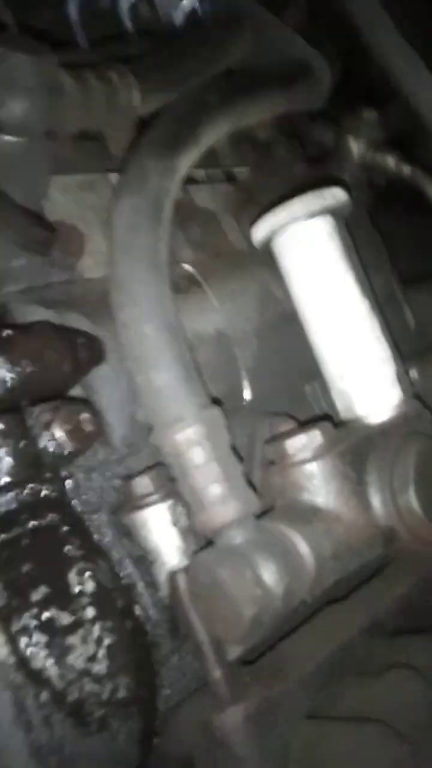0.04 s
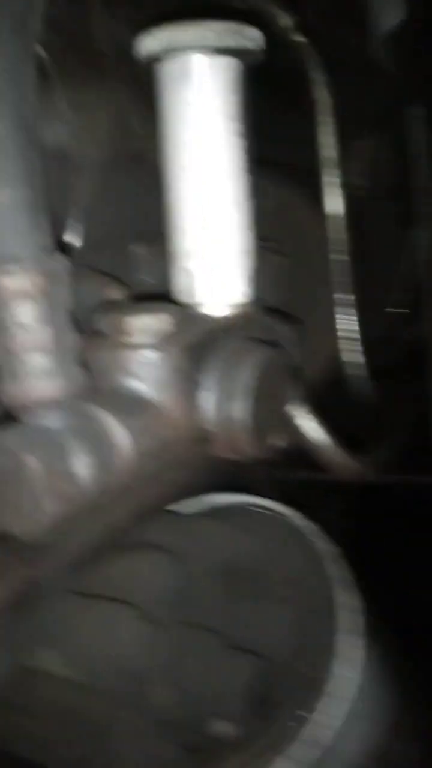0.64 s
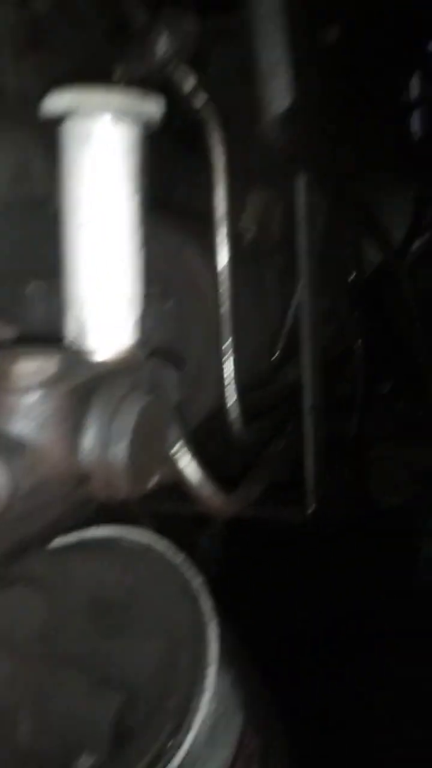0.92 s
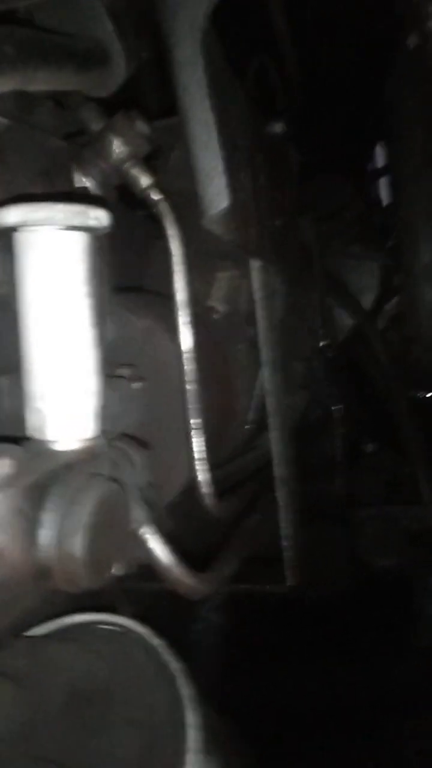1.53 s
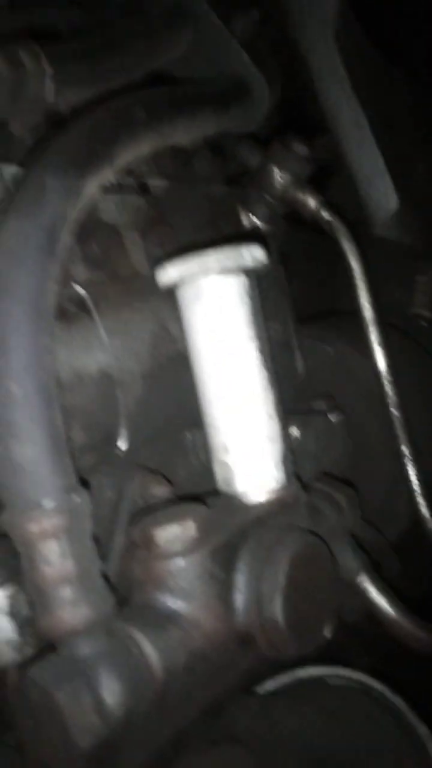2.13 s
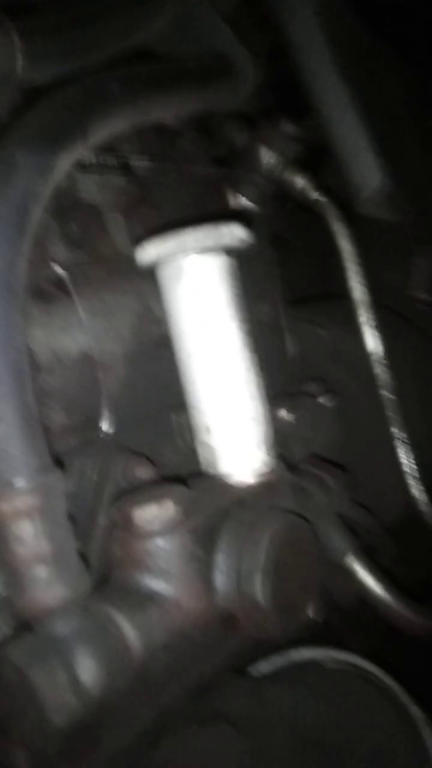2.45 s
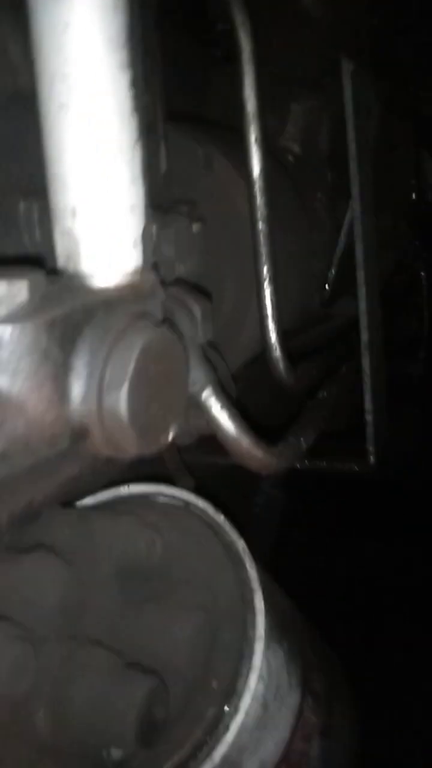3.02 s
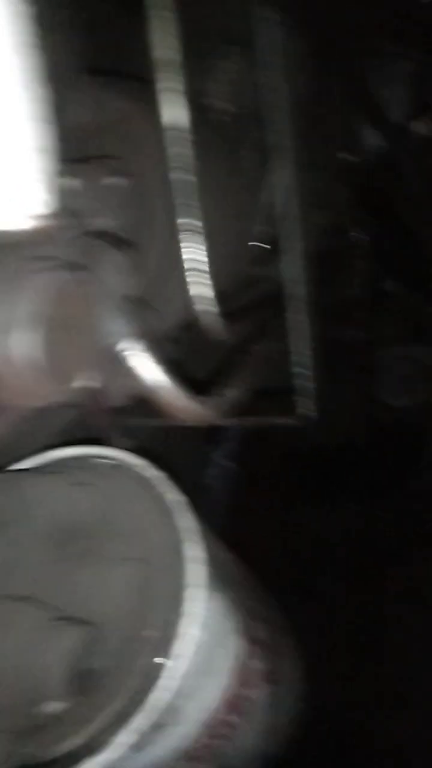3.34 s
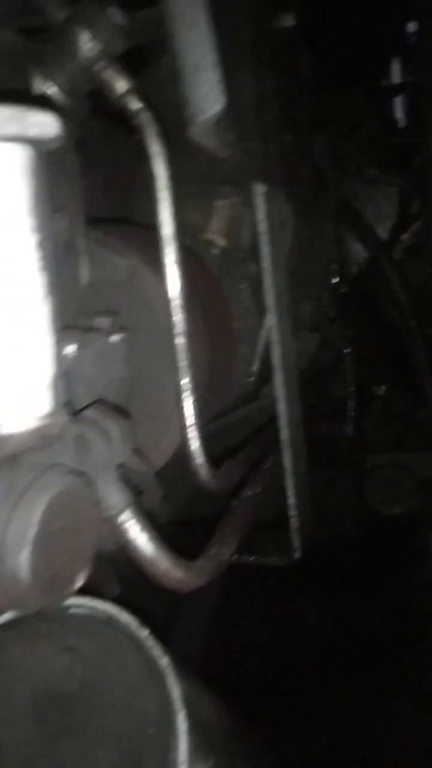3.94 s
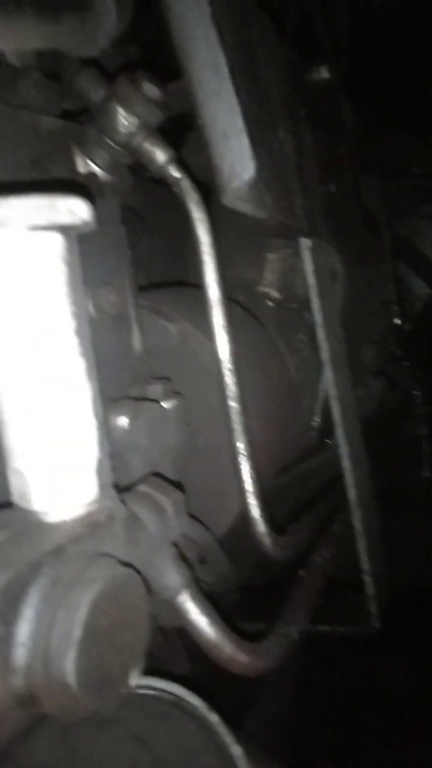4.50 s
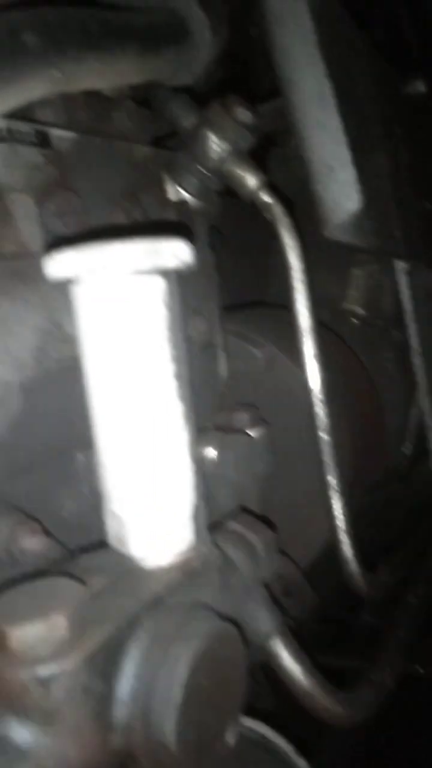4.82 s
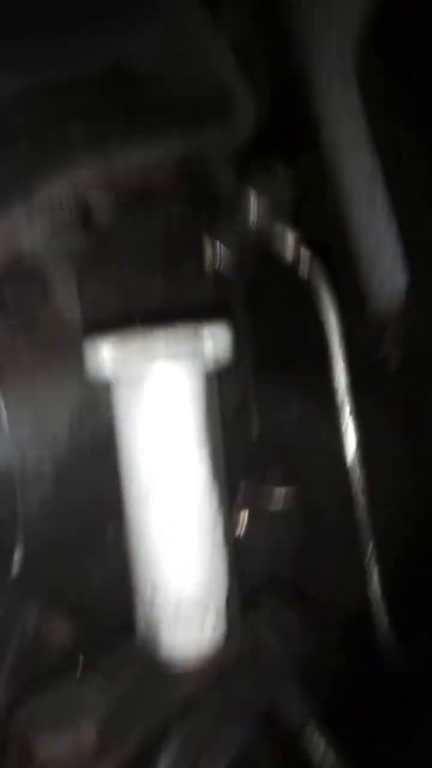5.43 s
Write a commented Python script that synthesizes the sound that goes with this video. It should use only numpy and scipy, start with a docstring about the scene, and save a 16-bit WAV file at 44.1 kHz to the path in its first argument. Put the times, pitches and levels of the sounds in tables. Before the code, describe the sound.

A diesel engine idles close up with a hollow, chugging clatter, bright metallic ticks and clinks over a soft wash of fan noise.

```python
"""A hollow, chugging clatter with bright ticks: a six-cylinder diesel idling in its bay, heard a hand's
length from the fuel pump. The same round of knocks excites the broad modes of the block every two turns.
Each injection ticks and sets pipes and brackets ringing, and close metal walls reflect the clinks.
Beneath lie a soft harmonic exhaust drone and a wash of fan and gear noise. The microphone wanders,
so different parts come forward in turn."""
import sys
import numpy as np
from scipy import signal
from scipy.fft import rfft, irfft
from scipy.io import wavfile
from scipy.ndimage import uniform_filter1d

SR = 44100
rng = np.random.default_rng(int(sys.argv[2]) if len(sys.argv) > 2 else 0)


def wrap_up_sound(samples):
    """Save the sound to the file named by the first command line argument, as 16-bit audio."""
    columns = np.atleast_2d(samples).T
    # keep every value between -1 and 1, then stretch to whole-number steps
    tamed = np.clip(columns, -1, 1)
    steps = np.round(tamed * 32767).astype(np.int16)
    wavfile.write(sys.argv[1], SR, steps)


N = 245195
TIME = np.arange(N) / SR
IDLE_RPM = 691.3
CYCLE = round(2 * 60 / IDLE_RPM * SR)  # samples in two turns of the crank
MODE_DRIFTS_PER_S = 5.095  # how often the light modes' strength and the sizzle's pitch change course

# the six injections of a cycle and how hard each shakes the light parts:
# angle_deg, tick_db, shield_db, brackets_db, clamps_db, pump_db, pipes_db
INJECTIONS = [(0.0, 13, 8, 1, 7, 10.5, 5), (123.6, 7.5, -4, 1.5, -2, 12, 7),
              (238, 12, -3.5, -0.5, -2.5, 12.5, 10), (355, 9.5, 8, -3, 3, 8.5, 2),
              (479.5, 9.5, 0, 4, 3, 8, 13), (601.3, 14, 0, 7, -9.5, 5, 8.5)]


def knocking(crank_deg):
    """Impact excitation: a repeating round of blows drives the modes of block, cover, casting and sump."""
    # piston and valve knocks in one cycle: angle_deg, block_db, cover_db, casting_db
    knocks = [(20.48, -3.5, 0.5, -3), (68.83, 2.5, 2.5, -4.5), (133.53, 2, 6, -9.5),
              (173.5, -0.5, 11.5, -31), (220.6, 0, 0, -7.5), (273.0, 6, 3, -37), (313.0, 4, -2, -28),
              (365.0, 5, -1.5, -4), (417.0, 8, -2.5, -4), (489, 2, -6.5, 7.5), (530.0, 1, -3.5, -1),
              (559.4, -3, -25, -3), (601.6, -4.5, 2, 11), (696, -1.5, -11, 1.5)]
    # dull thumps in one cycle: angle_deg, level_db
    thumps = [(25, -11), (80, -8), (162, -1.5), (392, -1), (490, -53), (530, 2), (682, -3.5)]
    # modes of each heavy part: pitch_hz, width_hz, level_db
    block_modes = [(650, 40, 1.5), (702.5, 86, 6), (739, 50, 7.5), (802, 46, -6.5)]
    cover_modes = [(472.4, 64, -8.5), (524.3, 50, 1), (590.3, 45, 1)]
    casting_modes = [(861.5, 49, 3), (965, 58, -1), (1049, 34, -10)]
    sump_modes = [(310, 55, 0), (383.6, 59, 0)]
    # the block's note dips late on: time_s, pitch_ratio
    block_pitch = [(0.0, 1), (4.0, 1), (5.1, 0.933), (5.56, 1)]
    # the block chugs in uneven surges: time_s, level_db
    block_level = [(0.0, -30.5), (0.1, -27.5), (0.26, -32), (0.31, -43), (0.36, -27.5), (0.5, -33),
                   (0.56, -26.5), (0.63, -31.5), (0.75, -30), (0.84, -40.5), (0.92, -24), (0.98, -34.5),
                   (1.1, -29), (1.24, -33.5), (1.31, -28), (1.46, -27.5), (1.53, -39), (1.57, -30),
                   (1.64, -29), (1.71, -41), (1.77, -26), (1.84, -36), (2.0, -26.5), (2.06, -35),
                   (2.16, -29), (2.64, -28), (2.8, -25.5), (2.91, -38.5), (3.0, -26), (3.1, -34.5),
                   (3.16, -25.5), (3.26, -33.5), (3.34, -25.5), (3.43, -30.5), (3.54, -25.5), (3.6, -35.5),
                   (3.65, -27.5), (3.85, -30), (3.89, -37.5), (4.04, -25), (4.15, -34), (4.21, -28.5),
                   (4.31, -37), (4.38, -28.5), (4.46, -45), (4.52, -33.5), (4.65, -48), (4.77, -32),
                   (4.82, -33), (4.89, -28.5), (4.93, -29), (4.98, -50), (5.07, -43), (5.13, -67),
                   (5.18, -36), (5.27, -48), (5.32, -27.5), (5.44, -46), (5.5, -32), (5.56, -49)]
    # the other parts come and go as the microphone wanders: time_s, level_db
    cover_level = [(0.0, -52), (0.2, -37.5), (0.4, -41.5), (0.5, -45), (0.71, -39.5), (1.18, -39),
                   (1.28, -35), (1.37, -65), (1.59, -31), (1.7, -38), (2.11, -31), (2.48, -42),
                   (2.61, -35.5), (2.85, -33), (3.08, -41.5), (3.29, -35.5), (3.66, -33), (3.79, -37.5),
                   (4.04, -30), (4.15, -36), (5.17, -32.5), (5.33, -36.5), (5.46, -34.5), (5.56, -43)]
    casting_level = [(0.0, -61), (0.1, -36), (0.38, -40.5), (0.47, -29), (0.58, -34), (0.65, -24.5),
                     (0.74, -37.5), (1.17, -27), (1.28, -40.5), (1.52, -33.5), (1.79, -41.5), (2.02, -39),
                     (2.14, -61), (2.23, -40.5), (2.46, -60), (2.56, -34), (2.68, -54), (2.89, -38),
                     (3.17, -41), (3.32, -36), (3.5, -29.5), (3.87, -48), (3.97, -34), (4.07, -49),
                     (4.38, -58), (4.48, -37), (4.56, -54), (5.07, -66), (5.47, -62), (5.56, -49)]
    sump_level = [(0.0, -43), (1.39, -48), (2.0, -41), (2.9, -36.5), (3.45, -42), (3.9, -36), (4.31, -45),
                  (4.6, -42), (5.56, -41.5)]
    block = heavy_part(crank_deg, column(knocks, 1), block_modes, scatter_db=1.5, surge_db=4,
                       jitter_s=0.0004, grit=0.2, grit_s=0.0022, waver=0.04, pitch=curves(block_pitch)[0])
    cover = heavy_part(crank_deg, column(knocks, 2), cover_modes, scatter_db=4, surge_db=3.5,
                       jitter_s=0.0004, grit=0.49, grit_s=0.0046, waver=0.03)
    casting = heavy_part(crank_deg, column(knocks, 3), casting_modes, scatter_db=6.5, surge_db=0,
                         jitter_s=0.0006, grit=0.48, grit_s=0.00054, waver=0.021)
    sump = heavy_part(crank_deg, thumps, sump_modes, scatter_db=5, surge_db=2,
                      jitter_s=0.00056, grit=0.64, grit_s=0.011, waver=0.025)
    return (from_db(curves(block_level)[0] + 0.34) * evened(block, CYCLE // 3)
            + from_db(curves(cover_level)[0] - 1.3) * evened(cover, CYCLE // 2)
            + from_db(curves(casting_level)[0] - 4.5) * evened(casting, CYCLE // 2)
            + from_db(curves(sump_level)[0] - 5) * evened(sump, CYCLE))


def heavy_part(crank_deg, pattern, modes, scatter_db, surge_db, jitter_s, grit, grit_s, waver, pitch=1):
    """Modal superposition: clicks with a gritty chatter drive broad resonances that waver in pitch."""
    bend = pitch + waver * drift(TIME * 14)
    out = 0
    for k, (hz, width_hz, db) in enumerate(modes):
        clicks = blows(crank_deg, pattern, scatter_db, jitter_s)
        chatter = fade(clicks, grit_s) * rng.standard_normal(N) / np.sqrt(grit_s * SR / 2)
        polarity = (-1) ** k  # neighbouring modes start in opposite directions
        force = (clicks * polarity + grit * chatter) * from_db(surge_db * surge())
        out = out + from_db(db) * rms_one(wavering_mode(force, hz * bend, width_hz))
    return out


def hard_knocks():
    """Transient response: the hardest blows each raise one brief, low note."""
    # single knocks and thumps: start_s, pitch_hz, level_db, length_s
    strikes = [(0.349, 680, -21.5, 0.008), (0.376, 525, -21.5, 0.01), (0.433, 730, -18, 0.0091),
               (0.456, 840, -23, 0.0074), (0.539, 964, -24.5, 0.01), (0.546, 330, -29.5, 0.015),
               (0.626, 886, -23, 0.0078), (0.694, 653, -15, 0.0071), (0.713, 710, -14.5, 0.0089),
               (0.751, 701, -15.5, 0.01), (0.801, 894, -21.5, 0.009), (0.89, 727, -21.5, 0.0071),
               (0.974, 897, -26, 0.011), (1.016, 766, -23.5, 0.011), (1.146, 910, -25, 0.0099),
               (1.175, 964, -30, 0.0063), (1.242, 510, -21, 0.0071), (1.324, 947, -28, 0.0077),
               (1.334, 340, -28, 0.0091), (1.355, 745, -17.5, 0.011), (1.409, 725, -17, 0.0093),
               (1.482, 867, -24.5, 0.0078), (1.506, 332, -28, 0.011), (1.526, 937, -23, 0.0085),
               (1.999, 592, -20.5, 0.0095), (2.112, 650, -16.5, 0.0076), (2.228, 688, -20.5, 0.014),
               (2.275, 727, -18, 0.011), (2.315, 752, -18, 0.0071), (2.339, 730, -18, 0.013),
               (2.361, 493, -24, 0.02), (2.545, 337, -22, 0.0094), (2.6, 655, -19, 0.015),
               (2.625, 706, -18, 0.0088), (2.646, 515, -21.5, 0.011), (2.665, 720, -19.5, 0.0099),
               (2.689, 708, -18, 0.013), (2.723, 360, -25, 0.012), (2.756, 334, -24, 0.0099),
               (2.783, 725, -20.5, 0.014), (2.834, 758, -18.5, 0.015), (2.868, 688, -19, 0.0063),
               (2.891, 487, -21, 0.0066), (2.894, 358, -28, 0.0077), (2.954, 679, -15, 0.0062),
               (2.968, 715, -15.5, 0.012), (3.185, 730, -20.5, 0.01), (3.239, 493, -18, 0.0095),
               (3.258, 490, -23.5, 0.021), (3.29, 662, -18, 0.0072), (3.303, 732, -15.5, 0.0066),
               (3.327, 706, -19, 0.013), (3.433, 965, -32, 0.014), (3.463, 686, -18, 0.0056),
               (3.476, 680, -16.5, 0.0071), (3.496, 755, -19, 0.013), (3.524, 678, -18.5, 0.011),
               (3.581, 525, -28, 0.031), (3.606, 965, -29, 0.0091), (3.674, 322, -29, 0.014),
               (3.685, 510, -22.5, 0.016), (3.704, 737, -18, 0.013), (3.845, 332, -31, 0.013),
               (3.861, 484, -26, 0.017), (3.908, 714, -22, 0.009), (3.929, 690, -18, 0.0086),
               (4.024, 590, -24, 0.011), (4.055, 741, -18, 0.012), (4.075, 709, -19, 0.012),
               (4.111, 327, -26, 0.0061), (4.456, 329, -26, 0.0094), (4.535, 532, -20.5, 0.015),
               (4.622, 483, -19.5, 0.0079), (4.916, 525, -18.5, 0.0071), (4.961, 486, -26.5, 0.021),
               (5.137, 493, -20, 0.021), (5.231, 531, -21.5, 0.011), (5.314, 476, -21.5, 0.011),
               (5.497, 330, -26, 0.0089)]
    return damped_notes(strikes, gain_db=-2, tail_db=-14, tail_s=0.02, rough=0.06, rough_hz=120)


def rattle(crank_deg):
    """Forced vibration: pipes and pump answer each injection first; clamps, brackets and shield lag."""
    # modes of each light part: pitch_hz, spread_hz, level_db
    shield_modes = [(1187, 46.3, -3.5), (1280, 54, -7.5), (1365, 36.5, 0.5), (1518, 34, 0)]
    bracket_modes = [(1837, 24.5, 1.7), (1967, 14, 6.7), (1988, 9, 13)]
    clamp_modes = [(2162, 62, 10.4), (2338, 29, 8.4), (2640, 110, 9.5), (2720, 70, 0.55)]
    pump_modes = [(3016, 120, 3), (3340, 60, 10.5), (3444, 18.6, 7.5), (3546, 98, 3), (3850, 160, 0.5)]
    pipe_modes = [(4240, 50, 0), (4500, 36, 13), (4660, 83, 5), (4940, 120, 10.5), (5180, 62, 4.5),
                  (5600, 110, 6.5), (6020, 68, -1.5), (6530, 130, 2), (6400, 42, -4.5), (6840, 120, 1),
                  (7520, 120, 1)]
    # the parts come and go: time_s, shield_db, brackets_db, clamps_db, pump_db, pipes_db
    part_levels = [(0.0, -45.5, -58.5, -42.5, -52.5, -41.5), (0.56, -61, -37, -38.5, -43, -61),
                   (0.7, -50, -49.5, -52, -39, -42.5), (0.83, -59, -44.5, -40.5, -42, -56),
                   (1.39, -56, -44.5, -39.5, -48.5, -55.5), (1.53, -61, -48.5, -40, -39.5, -46),
                   (1.81, -52, -35.5, -43.5, -44, -54), (2.08, -49, -50, -48, -45, -60.5),
                   (2.36, -49, -43, -53, -57, -45), (2.64, -51.5, -58, -47, -52, -37.5),
                   (3.06, -46, -56, -49.5, -49.5, -42.5), (3.34, -46.5, -58, -50.5, -55.5, -48.5),
                   (4.17, -44.5, -41, -40.5, -43, -50.5), (5.56, -36.5, -41.5, -47.5, -42.5, -44)]
    shield_db, brackets_db, clamps_db, pump_db, pipes_db = curves(part_levels)
    shield = light_part(crank_deg, column(INJECTIONS, 2), shield_modes, lag_deg=28.6,
                        scatter_db=9, jitter_s=0.0046, length_s=0.006, tail=0.59)
    brackets = light_part(crank_deg, column(INJECTIONS, 3), bracket_modes, lag_deg=14.2,
                          scatter_db=6.5, jitter_s=0.0037, length_s=0.0064, tail=0.52)
    clamps = light_part(crank_deg, column(INJECTIONS, 4), clamp_modes, lag_deg=6.9,
                        scatter_db=9, jitter_s=0.0014, length_s=0.0063, tail=0.47)
    pump = light_part(crank_deg, column(INJECTIONS, 5), pump_modes, lag_deg=2.2,
                      scatter_db=8.5, jitter_s=0.0015, length_s=0.0091, tail=0.1)
    pipes = light_part(crank_deg, column(INJECTIONS, 6), pipe_modes, lag_deg=1.7,
                       scatter_db=11, jitter_s=0.00085, length_s=0.0063, tail=0.37)
    return (from_db(pipes_db - 3) * pipes + from_db(pump_db - 3) * pump + from_db(clamps_db - 3.5) * clamps
            + from_db(brackets_db - 1) * brackets + from_db(shield_db - 2) * shield)


def light_part(crank_deg, pattern, modes, lag_deg, scatter_db, jitter_s, length_s, tail):
    """Impact and rebound: each firing rings every mode, slightly off pitch, and the part bounces once."""
    bounce_deg, bounce_db, drift_db = 42, -10, 6.5
    firing = np.maximum((crank_deg - lag_deg + 10) // 120 + 1, 0).astype(int)
    age = np.arange(SR // 12) / SR / length_s
    clink = swell(age) + tail * np.minimum(age, 1) ** 2 * np.exp(-age / 2.8)
    out = 0
    for hz, spread_hz, db in modes:
        hits = blows(crank_deg - lag_deg, pattern, scatter_db, jitter_s)
        bounces = blows(crank_deg - lag_deg - bounce_deg, pattern, scatter_db, jitter_s=0.004)
        envelope = signal.oaconvolve(hits + from_db(bounce_db) * bounces, clink)[:N]
        envelope *= from_db(drift_db * drift(TIME * MODE_DRIFTS_PER_S))  # modes take turns in the lead
        pitch_hz = hz + spread_hz * rng.standard_normal(size=256)[firing]
        out = out + from_db(db) * rms_one(envelope * np.sin(2 * np.pi * np.cumsum(pitch_hz) / SR))
    return evened(out, CYCLE)


def loose_clinks():
    """Free vibration: loose parts ring briefly at high natural frequencies."""
    # the loudest clinks: start_s, pitch_hz, level_db, length_s
    pings = [(0.05, 3500, -27, 0.0087), (0.051, 4590, -25.5, 0.0085), (0.107, 6490, -33, 0.008),
             (0.109, 4470, -36, 0.0072), (0.226, 4760, -39, 0.0078), (0.167, 6000, -34, 0.0071),
             (0.253, 6500, -31, 0.01), (0.284, 1866, -27.5, 0.0093), (0.315, 2376, -27, 0.0086),
             (0.396, 3557, -20.0, 0.006), (0.425, 3440, -29, 0.0057), (0.454, 2412, -29, 0.0083),
             (0.484, 6280, -33.5, 0.0067), (0.489, 2350, -25.5, 0.011), (0.512, 2396, -23, 0.011),
             (0.57, 3475, -19.5, 0.0066), (0.596, 3340, -21, 0.0062), (0.686, 3420, -30, 0.0072),
             (0.743, 3520, -20, 0.0074), (0.771, 3546, -26, 0.0066), (0.801, 6450, -21.5, 0.0075),
             (0.805, 1816, -26.5, 0.0069), (0.835, 2410, -25, 0.0072), (0.84, 6350, -31.0, 0.0067),
             (0.86, 6230, -31, 0.012), (0.862, 2140, -24.5, 0.0091), (0.917, 3820, -25.5, 0.0075),
             (0.975, 2153, -28.5, 0.008), (0.976, 3460, -32, 0.008), (1.034, 5970, -34, 0.008),
             (1.035, 2106, -30, 0.012), (1.092, 2180, -26.5, 0.013), (1.181, 2450, -29.5, 0.013),
             (1.266, 2190, -29.0, 0.014), (1.294, 3570, -28, 0.0091), (1.295, 2230, -30, 0.011),
             (1.351, 2460, -27.5, 0.015), (1.382, 2513, -24.5, 0.013), (1.446, 2420, -27.5, 0.0072),
             (1.526, 3488, -30.5, 0.01), (1.557, 3990, -32, 0.0073), (1.584, 3570, -26.5, 0.007),
             (1.673, 2140, -30, 0.0092), (1.727, 7590, -35.5, 0.0083), (1.845, 1896, -26, 0.012),
             (1.882, 1920, -24, 0.011), (1.898, 7420, -30.5, 0.0086), (2.071, 7420, -35, 0.0071),
             (2.084, 1486, -30, 0.009), (2.194, 1910, -28.5, 0.0065), (2.252, 1477, -28.5, 0.01),
             (2.305, 3490, -26.5, 0.01), (2.364, 5130, -35, 0.013), (2.398, 2000, -30.5, 0.017),
             (2.479, 4410, -25, 0.0071), (2.537, 4500, -26.0, 0.012), (2.567, 4280, -30, 0.0066),
             (2.654, 4360, -21, 0.0054), (2.683, 4460, -27, 0.0054), (2.803, 4440, -28.5, 0.0092),
             (2.913, 5040, -33, 0.014), (2.914, 5800, -29.5, 0.008), (2.914, 6350, -29, 0.008),
             (2.917, 4610, -30.5, 0.008), (2.943, 2690, -31.5, 0.0099), (2.945, 6050, -29.5, 0.008),
             (3.087, 4580, -36.5, 0.0059), (3.119, 3490, -32, 0.0098), (3.234, 5380, -37, 0.011),
             (3.236, 6580, -36, 0.0083), (3.406, 1340, -30.5, 0.022), (3.549, 7440, -43, 0.008),
             (3.577, 4800, -36.5, 0.01), (3.607, 6590, -28.5, 0.0095), (3.636, 4800, -37, 0.0072),
             (3.637, 3467, -34, 0.0084), (4.026, 1990, -30.5, 0.013), (4.043, 4660, -31.5, 0.01),
             (4.054, 1186, -30, 0.0093), (4.055, 1970, -28.5, 0.0088), (4.142, 1980, -28.5, 0.0092),
             (4.189, 2026, -29.5, 0.015), (4.215, 5940, -26, 0.0071), (4.372, 2020, -31, 0.014),
             (4.424, 1280, -27.5, 0.012), (4.447, 5380, -29, 0.01), (4.476, 3370, -31, 0.011),
             (4.507, 1970, -29, 0.043), (4.559, 1956, -26, 0.013), (4.679, 3400, -31, 0.014),
             (4.738, 2014, -30.0, 0.032), (4.794, 5270, -29, 0.0064), (4.823, 4400, -32.5, 0.0071),
             (4.88, 3390, -26.5, 0.007), (4.907, 3440, -33, 0.008), (4.972, 1900, -26, 0.0065),
             (4.995, 5920, -27, 0.0074), (5.022, 1990, -21, 0.013), (5.052, 3520, -24.5, 0.0051),
             (5.061, 1990, -27, 0.02), (5.115, 1246, -24.5, 0.019), (5.142, 1877, -26, 0.013),
             (5.154, 1265, -28, 0.01), (5.183, 1200, -29.0, 0.01), (5.202, 1480, -28, 0.015),
             (5.227, 2720, -26.5, 0.0064), (5.228, 3440, -22, 0.0053), (5.256, 3680, -26.0, 0.0071),
             (5.263, 2030, -25.5, 0.01), (5.291, 1298, -23, 0.0097), (5.314, 5290, -26.5, 0.0065),
             (5.321, 1860, -24.5, 0.011), (5.343, 5180, -27.5, 0.01), (5.385, 1190, -25, 0.011),
             (5.403, 2690, -29.5, 0.0078), (5.43, 3450, -29, 0.011), (5.445, 1230, -24.5, 0.011),
             (5.473, 1231, -21, 0.011), (5.494, 1940, -27, 0.0073), (5.52, 6300, -33, 0.0097),
             (5.534, 1210, -30, 0.0086)]
    return damped_notes(pings, gain_db=-1.2, tail_db=-12, tail_s=0.024, rough=0.13, rough_hz=300)


def damped_notes(events, gain_db, tail_db, tail_s, rough, rough_hz):
    """Contact damping: a shaken part swells to a rough note, is checked by its seat and rings faintly."""
    out, t = np.zeros(N + SR), np.arange(SR // 8) / SR
    for start_s, hz, db, length_s in events:
        age = t / max(length_s, 0.008)  # even the lightest part needs a few milliseconds to swell
        tail = from_db(tail_db) * np.minimum(age, 1) * np.exp(-t / tail_s)
        tone = np.sin(2 * np.pi * (hz * t + rng.random()))
        roughness = rough * rms_one(resonate(rng.standard_normal(len(t)), hz, width_hz=rough_hz))
        at = max(round(start_s * SR), 0)
        out[at:at + len(t)] += from_db(db + gain_db) * (swell(age) + tail) * (tone + roughness)
    return out[:N]


def injectors(crank_deg):
    """Amplitude-modulated noise: each injection ticks and spits; the nozzles ring thinly and sizzle."""
    # spectra of the tick and of its high fizz: frequency_hz, level_db
    tick_spectrum = [(1200, 12.5), (2500, 15.5), (4000, 8), (6300, 11), (8000, 1), (10000, -7.5),
                     (13000, -33), (15500, -71)]
    fizz_spectrum = [(9000, -45), (12500, -2), (14000, -8), (15600, -7), (16000, -12)]
    # modes of the nozzles: pitch_hz, spread_hz, level_db
    nozzle_modes = [(9000, 280, -1), (9600, 260, -8), (10230, 120, -0.5), (10820, 310, 2), (11570, 200, 7),
                    (12450, 200, -7)]
    # slow changes in the fizz and in the nozzles' ring and sizzle: time_s, level_db
    fizz_level = [(0.0, -61.0), (2.08, -72.0), (2.43, -58.5), (2.78, -54.5), (3.3, -63.5), (3.47, -72.5),
                  (4.86, -70.0), (5.04, -75.5), (5.56, -69.0)]
    nozzle_level = [(0.0, -56.5), (0.68, -60.5), (0.85, -56), (3.78, -62), (5.5, -56.5)]
    rise_s, blur_s, bay_share = 0.0013, 0.005, 0.38
    fizz_db, nozzle_db = curves(fizz_level)[0], curves(nozzle_level)[0]
    ticks = column(INJECTIONS, 1)
    clicks = blows(crank_deg + 1, ticks, scatter_db=2.5, jitter_s=0.00071)  # one degree early
    onset = fade(fade(clicks, rise_s), rise_s)
    spit = rms_one(rms_one(fade(onset, seconds=0.004)) + 0.73)  # the floor lasts between injections
    blurred = uniform_filter1d(onset, size=round(blur_s * SR))  # softens the start of each tick
    snap = rms_one(fade(blurred, seconds=0.0056) + bay_share * fade(blurred, seconds=0.023))
    grit = from_db(-49.5) * patchy(coloured_noise(tick_spectrum), crank_deg)
    fizz = from_db(fizz_db + 2) * coloured_noise(fizz_spectrum)
    ring = light_part(crank_deg, ticks, nozzle_modes, lag_deg=-2,
                      scatter_db=7, jitter_s=0.001, length_s=0.0045, tail=0.86)
    spray = spit * rng.standard_normal(N)
    sizzle_hz = 11570 + 150 * drift(TIME * MODE_DRIFTS_PER_S)
    sizzle = rms_one(wavering_mode(spray, sizzle_hz, width_hz=840))
    return snap * grit + spit * fizz + from_db(nozzle_db - 1) * ring + from_db(nozzle_db - 1.5) * sizzle


def bay(x, decay_s=0.018, echo_db=-10.5):
    """Reverberation: close metal walls add a short, dense tail to every clink."""
    t = np.arange(SR // 6) / SR
    echoes = rng.standard_normal(len(t)) * np.exp(-t / decay_s) * np.minimum(t / decay_s, 1)
    return x + from_db(echo_db) * signal.oaconvolve(x, echoes / np.linalg.norm(echoes))[:N]


def exhaust_drone(crank_deg):
    """Harmonic series: multiples of the cycle rate waver in strength while their sum stays steady."""
    # the exhaust's strong harmonics: harmonic_number, relative_db
    strong = [(9, -68.5), (10, -70.5), (14, -66.5), (18, -65.5), (24, -66), (28, -65.5), (30, -53.5),
              (32, -54.5), (34, -54), (35, -59.5), (36, -61), (38, -61.5)]
    weak = [(k, -76) for k in range(8, 43) if k not in dict(strong)]
    cycles, out = crank_deg / 720, 0
    for k, db in strong + weak:
        waver = 1 + 0.3 * drift(TIME * 8)
        out = out + from_db(db) * waver * np.sin(2 * np.pi * (k * cycles + rng.random()))
    return from_db(-49) * evened(out, CYCLE // 8)


def fan_and_gears():
    """Stationary broadband noise: a steady wash, strongest in the low middle range."""
    # spectrum of the wash: frequency_hz, level_db
    wash_spectrum = [(25, -7), (60, 17), (120, -5), (190, 11), (250, 19), (420, 22), (700, 23), (1100, 16),
                     (2200, 10.5), (4000, -6.5), (15000, -35)]
    return from_db(-45) * coloured_noise(wash_spectrum)


def blows(crank_deg, pattern, scatter_db, jitter_s):
    """Quasi-periodic impulses: one click per row in each cycle, scattered in strength and timing."""
    angle_deg, db = np.transpose(pattern)
    angles = (720 * np.arange(34)[:, None] + angle_deg).ravel()
    lateness, strength = rng.standard_normal((len(angles), 2)).T
    due = np.interp(angles, crank_deg, np.arange(N), right=2 * N)
    at = np.round(due + jitter_s * SR * lateness).astype(int).clip(0)
    sizes = from_db(np.resize(db, len(angles)) + scatter_db * np.clip(strength, -2, 2))
    heard = at < N
    return np.bincount(at[heard], sizes[heard], N)


def wavering_mode(x, hz, width_hz):
    """Heterodyne resonance: shift a moving centre frequency to zero, smooth twice and shift back."""
    carrier = np.exp(2j * np.pi * np.cumsum(hz) / SR)
    decay_s = 1 / (np.pi * width_hz)
    return np.real(carrier * fade(fade(x / carrier, decay_s), decay_s))


def resonate(x, hz, width_hz):
    """Two-pole resonance with unit peak gain."""
    r = np.exp(-np.pi * width_hz / SR)
    feedback = [1, -2 * r * np.cos(2 * np.pi * hz / SR), r * r]
    return signal.lfilter(np.array([1, 0, -1]) * (1 - r * r) / 2, feedback, x + 1e-18)


def patchy(noise, crank_deg, width_hz=400, swing_db=4.5):
    """Spectral modulation: interleaved bands drift to new strengths at every firing; rms 1."""
    spectrum = rfft(noise)
    band = np.arange(len(spectrum)) * SR / N // width_hz % 9
    return rms_one(sum(irfft(spectrum * (band == k), N) * from_db(swing_db * drift(crank_deg / 120))
                       for k in np.unique(band)))


def coloured_noise(spectrum):
    """Spectral shaping of white noise by rows of frequency_hz, level_db; rms 1."""
    hz, db = np.transpose(spectrum)
    bins_hz = np.maximum(np.arange(N // 2 + 1) * SR / N, 1)
    low_cut = np.minimum(bins_hz / hz[0], 1) ** 2
    gain = from_db(np.interp(np.log(bins_hz), np.log(hz), db)) * low_cut
    return rms_one(irfft(rfft(rng.standard_normal(N)) * gain, N))


def surge(hz=3.14):
    """Soft-limited narrowband noise: a slow, uneven rise and fall; rms about 1."""
    return np.tanh(coloured_noise([(hz / 2, -6), (hz, 0), (2 * hz, -12), (10 * hz, -110)])) / 0.63


def drift(steps):
    """Linear interpolation between random values, one at every whole step."""
    return np.interp(steps, np.arange(256), rng.standard_normal(size=256))


def swell(age):
    """Raised-cosine pulse, above half height from age 0.4 to 1.2."""
    return np.sin(np.pi * np.minimum(age / 1.6, 1)) ** 2


def fade(x, seconds):
    """Leaky integration: every pulse dies away exponentially."""
    return signal.lfilter([1], [1, -np.exp(-1 / (seconds * SR))], x + 1e-18)


def evened(x, samples):
    """Division by the running rms holds the level near 1."""
    return x / np.sqrt(np.abs(uniform_filter1d(x ** 2, samples)) + 1e-4 * np.mean(x ** 2))


def curves(rows):
    """Each column after time_s, interpolated at every sample."""
    time_s, *columns = np.transpose(rows)
    return [np.interp(TIME, time_s, values) for values in columns]


def column(table, index):
    """The crank angles of a table with one of its level columns."""
    return np.array(table)[:, [0, index]]


def from_db(db):
    return 10 ** (np.asarray(db) / 20)


def rms_one(x):
    return x / np.sqrt(np.mean(x ** 2) + 1e-20)


def scene():
    """Superposition of all sources; the crank times the repeating ones as the governor hunts gently."""
    hunt_rpm, hunt_period_s, start_deg = 2.8, 1.37, 31.1
    rpm = IDLE_RPM + hunt_rpm * np.sin(2 * np.pi * (TIME - 0.1) / hunt_period_s)
    crank_deg = start_deg + np.cumsum(rpm) * 360 / 60 / SR
    wash = fan_and_gears()
    clinks = loose_clinks()
    knocks = hard_knocks() + knocking(crank_deg)
    engine = knocks + injectors(crank_deg) + bay(rattle(crank_deg) + clinks) + exhaust_drone(crank_deg)
    return (engine + wash)[None]


def record(dry):
    """Band limiting: an elliptic low-pass cuts the top treble steeply."""
    cutoff_hz = 16000
    return signal.sosfilt(signal.ellip(10, 0.1, 80, cutoff_hz, fs=SR, output="sos"), dry)


dry = scene()
out = record(dry)
wrap_up_sound(out)
```